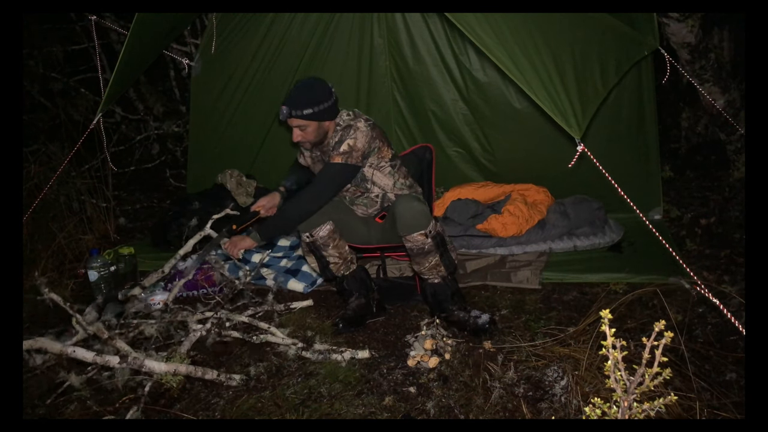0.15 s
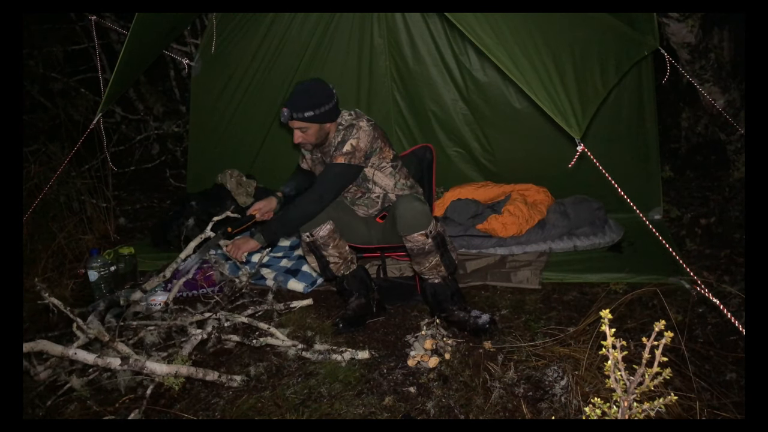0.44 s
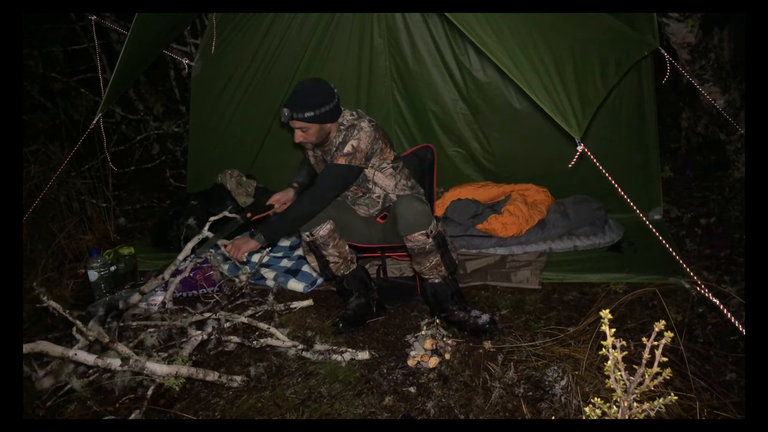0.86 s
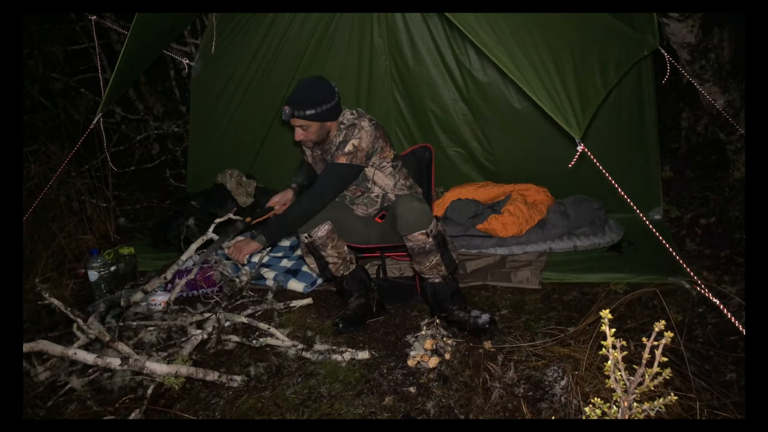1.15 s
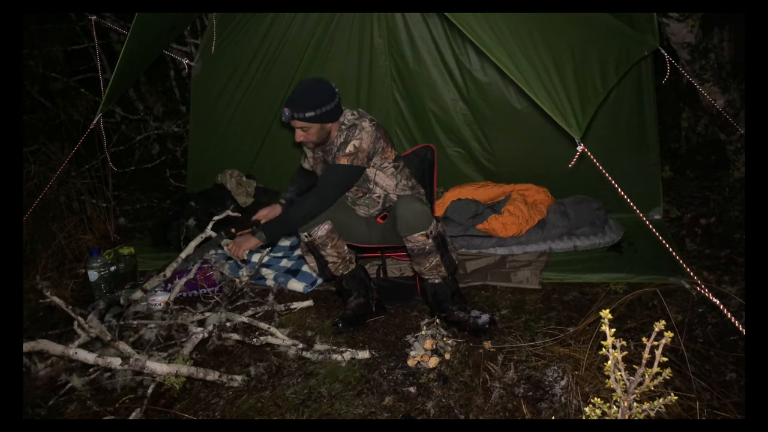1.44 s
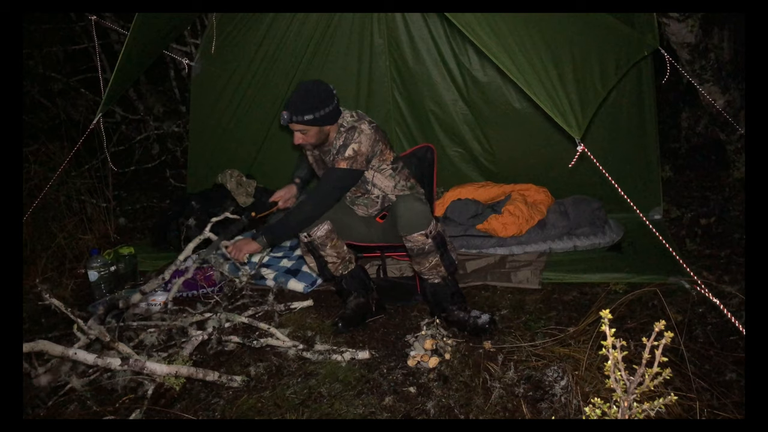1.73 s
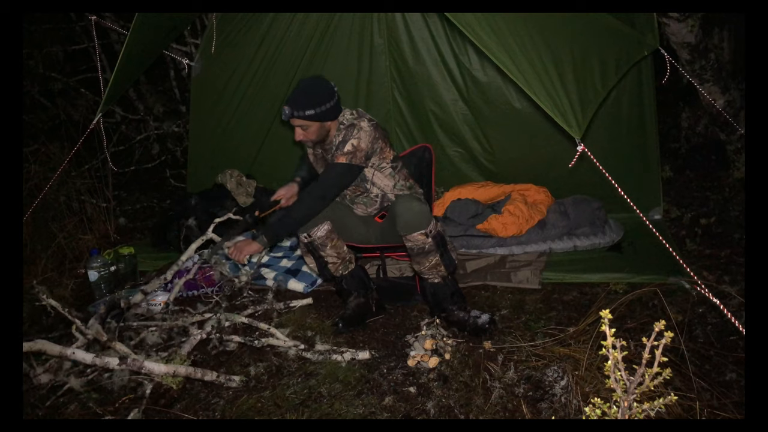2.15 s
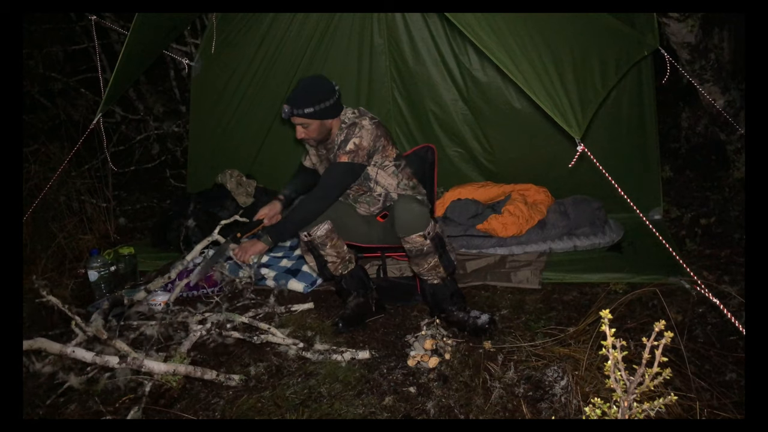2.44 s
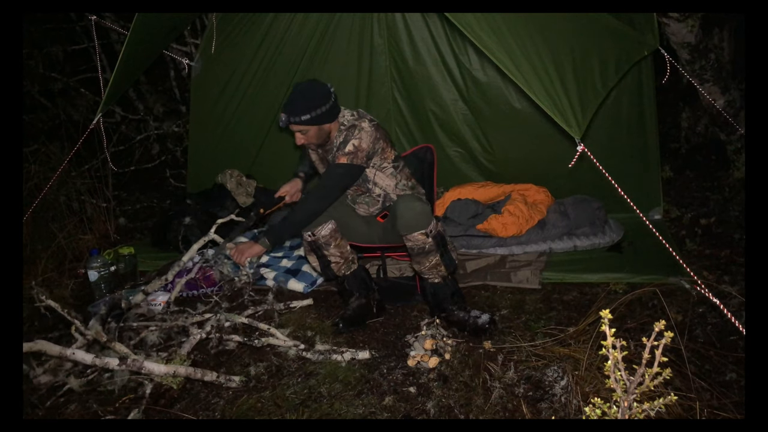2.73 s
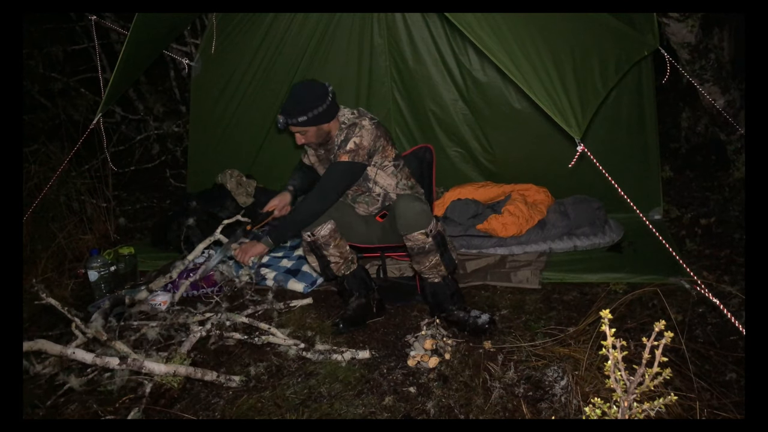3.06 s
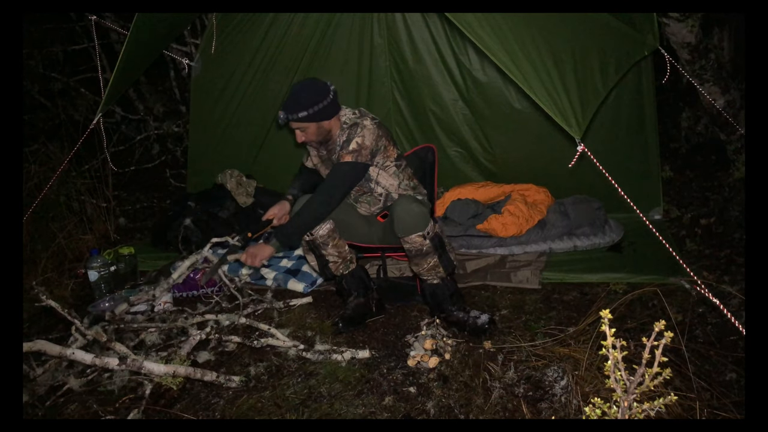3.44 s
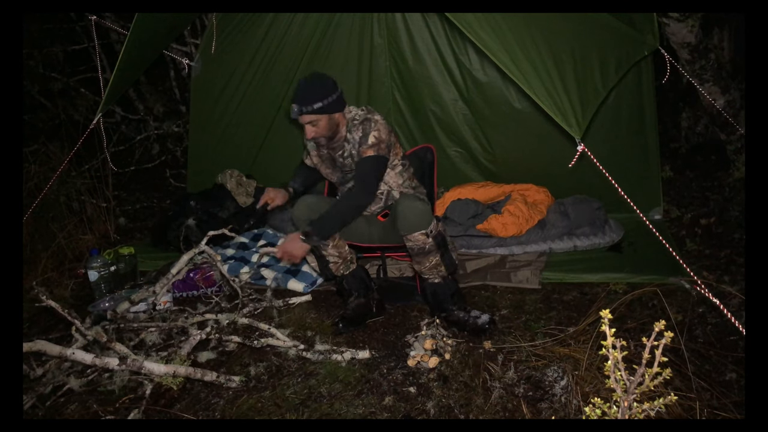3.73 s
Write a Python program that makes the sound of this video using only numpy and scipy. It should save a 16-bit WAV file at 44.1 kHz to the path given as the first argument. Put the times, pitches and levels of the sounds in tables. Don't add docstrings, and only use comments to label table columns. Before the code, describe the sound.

A small hand saw rasps back and forth through a dry branch until it snaps sharply

```python
import sys
import numpy as np
from scipy import signal
from scipy.fft import rfft, irfft
from scipy.io import wavfile
from scipy.ndimage import uniform_filter1d

SR = 44100
rng = np.random.default_rng(int(sys.argv[2]) if len(sys.argv) > 2 else 0)


def voltage_ratio(level):
    return 10 ** (np.asarray(level, float) / 20)


def bounce(signal):
    frames = np.transpose(np.atleast_2d(signal))
    limited = np.clip(frames, -1, 1)
    pcm = np.round(limited * 32767).astype(np.int16)
    wavfile.write(sys.argv[1], SR, pcm)


N = 171990

# centre in Hz, width in Hz, gain in dB.
WOOD_MODES = [(155, 220, -1.5), (227, 111, 4.5), (369, 103, -1), (668, 112, 2.5), (1135, 100, -0.5),
              (1467, 87, -2.5)]
BLOB_DB = 2.8


def level(x, db):
    return x * voltage_ratio(db) / np.sqrt(np.mean(x ** 2))


def colour(x, points):
    p, hz = np.array(points, float), np.fft.rfftfreq(len(x), 1 / SR)
    gain_db = np.interp(np.log(hz + 1), np.log(p[:, 0]), p[:, 1])
    return irfft(rfft(x) * voltage_ratio(gain_db), len(x))


def ring(x, hz, width):
    return signal.lfilter(*signal.iirpeak(hz, hz / width, SR), x)


def body(x, modes):
    return sum((-1) ** k * voltage_ratio(db) * ring(x, hz, width) for k, (hz, width, db) in enumerate(modes))


def filtered(x, order, hz, kind):
    return signal.sosfilt(signal.butter(order, hz, kind, fs=SR, output="sos"), x)


def walk(rate):
    hold = int(SR / rate)
    steps = np.repeat(rng.standard_normal(N // hold + 1), hold)
    return 1.272 * uniform_filter1d(uniform_filter1d(steps, hold), hold)[:N]


def grit(db, size=N):
    grain_db = db * np.minimum(rng.exponential(size=size), 4)
    return level(rng.standard_normal(size) * voltage_ratio(grain_db), 0)


def blobs(x, db, rate):
    hz = np.clip(np.fft.rfftfreq(N, 1 / SR), 500, 16000)
    place, spectrum = 4 * np.log2(hz / 500), rfft(x)
    out = np.zeros(N)
    for k in range(21):
        band = irfft(spectrum * np.clip(1 - np.abs(place - k), 0, 1), N)
        out += band * voltage_ratio(db * walk(rate))
    return out


def burst(t60, rise, size=8192):
    t = np.arange(size) / SR
    return (1 - np.exp(-t / rise)) * np.exp(-np.log(1000) * t / max(t60, 1e-3))


def add(out, start, x, db):
    i = int(start * SR)
    out[i:i + len(x)] += (x * voltage_ratio(db) / np.abs(x).max())[:N - i]


def night():
    # frequency in Hz, level in dB.
    air_curve = [(20, -46.5), (60, -2.5), (140, -7), (300, -11.5), (600, -12.5), (1200, -18), (5000, -23),
                 (16000, -28)]
    air = colour(rng.standard_normal(N), air_curve)
    return level(air * voltage_ratio(.8 * walk(21)), -73.5)


def brush():
    # time in seconds, level in dB.
    rustles = [
        [(0, -63), (.02, -76), (.05, -67), (.13, -69.5), (.2, -61.5), (.27, -67), (.32, -76), (.44, -75),
         (.5, -81)],
        [(1.77, -77), (1.81, -68), (1.87, -69)],
        [(2.28, -77), (2.32, -66.5), (2.37, -64)],
        [(3.0, -59.5), (3.05, -59.5), (3.09, -69), (3.11, -61.5), (3.28, -67), (3.33, -74)],
        [(3.37, -49), (3.42, -59), (3.45, -48.5), (3.488, -59.5), (3.517, -48), (3.545, -55.5), (3.565, -62),
         (3.6, -57.5), (3.64, -71)],
        [(3.64, -65.5), (3.69, -68.5), (3.715, -72), (3.733, -56.5), (3.752, -84), (3.795, -82), (3.82, -91)],
    ]
    # frequency in Hz, level in dB per Hz.
    brush_curve = [(60, -26.5), (150, -4), (450, -2.5), (900, -4), (2500, -5), (5000, -5.5), (9000, -6.5),
                   (16000, -16)]
    t, loud = np.arange(N) / SR, np.zeros(N)
    for rows in rustles:
        r = np.array(rows)
        loud += voltage_ratio(np.interp(t, r[:, 0], r[:, 1], -140, -140))
    scrape = level(colour(blobs(grit(2.8), BLOB_DB, 120), brush_curve), 0)
    scrape = scrape * loud * voltage_ratio(2 * walk(90))

    creak_start, creak_end = 0.94, 1.055
    u = np.clip((t - creak_start) / (creak_end - creak_start), 0, 1)
    pitch_hz = 1467 + 1216 * u
    creak = ring(rng.standard_normal(N), 150, 460) * np.sin(2 * np.pi * np.cumsum(pitch_hz) / SR)
    return scrape + level(creak, -63.5) * np.sin(np.pi * u)


def twigs():
    # start in seconds, peak in dB, centre in Hz, t60 in seconds.
    clicks = [(0.0668, -42.5, 9700, 0.008), (0.3864, -57, 5620, 0.008), (0.4294, -47.5, 6700, 0.018),
              (0.043, -59, 11000, 0.0092), (0.1430, -35.5, 9000, 0.017), (0.1700, -44, 6000, 0.008),
              (0.265, -54, 11000, 0.01), (0.3512, -43, 4400, 0.0088), (0.4025, -60, 8000, 0.008),
              (0.5425, -47, 5050, 0.01), (0.5553, -39, 7950, 0.0091), (0.6010, -37.5, 7670, 0.0074),
              (0.668, -41, 8000, 0.008), (0.9044, -53, 8800, 0.013), (0.9275, -36.5, 9400, 0.02),
              (0.9362, -26, 8100, 0.014), (0.9499, -24, 6100, 0.0091), (1.1488, -38.5, 7800, 0.01),
              (1.138, -52, 4480, 0.022), (1.1748, -35, 8300, 0.004), (1.365, -53, 7140, 0.012),
              (1.3876, -37.5, 8750, 0.01), (1.4225, -42, 7250, 0.01), (1.5143, -42, 3300, 0.044),
              (1.5617, -43.5, 6670, 0.018), (1.5722, -47, 4000, 0.01), (1.59, -36, 4790, 0.01),
              (1.8637, -37.5, 4340, 0.03), (1.9024, -25, 6760, 0.016), (1.9112, -26, 5900, 0.005),
              (2.105, -39.5, 12200, 0.01), (2.116, -40.5, 3190, 0.01), (2.329, -49.5, 6780, 0.009),
              (2.371, -38.5, 5700, 0.036), (2.523, -45, 8650, 0.01), (2.5325, -44, 6510, 0.01),
              (2.5714, -31, 7290, 0.0098), (2.5837, -33.5, 3730, 0.01), (2.609, -30.5, 5740, 0.01),
              (2.856, -51.5, 3298, 0.015), (2.8785, -49, 5590, 0.01), (2.8882, -40, 5654, 0.01),
              (3.109, -48, 3610, 0.015), (3.6646, -50, 4987, 0.01), (3.691, -49.5, 4000, 0.01),
              (3.7475, -48, 8900, 0.01), (3.794, -57.5, 9000, 0.012), (3.802, -58.5, 9730, 0.01),
              (3.857, -65, 4020, 0.01)]
    # start in seconds,
    # peak in dB, centre in Hz, t60 in seconds.
    scuffs = [(0.0975, -32.5, 3180, 0.018), (0.1035, -38, 7900, 0.009), (0.2339, -44, 4500, 0.015),
              (0.3485, -46.5, 4520, 0.035), (0.521, -56.5, 2940, 0.084), (1.4813, -38, 7830, 0.025),
              (1.489, -41.5, 8500, 0.0092), (1.798, -51, 3500, 0.044), (1.804, -52.5, 9600, 0.026),
              (1.9135, -34, 7000, 0.014), (2.047, -45, 2100, 0.02), (2.3112, -57, 3190, 0.05),
              (3.341, -46, 7000, 0.022), (3.3665, -25.5, 9000, 0.023), (3.3705, -36, 4500, 0.02),
              (3.4428, -33, 7500, 0.017), (3.4485, -36, 2940, 0.022), (3.4925, -43, 2920, 0.023)]
    # start in seconds, peak in dB, centre in Hz, t60 in seconds.
    woody_taps = [(0.0177, -53.5, 2800, 0.023), (0.0413, -65, 2590, 0.014), (0.1324, -46, 2750, 0.02),
                  (0.1427, -39.5, 2300, 0.013), (0.1695, -41, 1280, 0.016), (0.2085, -49.5, 2050, 0.02),
                  (0.2882, -57, 2380, 0.014), (1.03, -50, 2290, 0.03), (1.75, -57.5, 2180, 0.03)]
    # start in seconds, peak in dB, t60 in seconds.
    dull_knocks = [(0.101, -56, 0.11), (0.143, -49.5, 0.076), (0.169, -49, 0.027), (0.233, -50, 0.025),
                   (0.349, -55, 0.039), (0.99, -52, 0.042), (1.489, -51, 0.047), (1.993, -45, 0.1),
                   (2.495, -50, 0.07), (3.448, -56, 0.032), (3.499, -57, 0.14), (3.602, -64, 0.042)]
    out = np.zeros(N)
    kinds = ((clicks, .0002, 4.5, 9.5), (scuffs, .002, 4.5, 0), (woody_taps, .0006, -5, 0))
    for rows, rise, wide_db, spike_db in kinds:
        for start, db, hz, t60 in rows:
            spike = voltage_ratio(spike_db) * burst(0.0023, rise)
            tail = voltage_ratio(-15) * burst(t60 * 5, 0.0016)
            x = rng.standard_normal(8192) * (burst(t60, rise) + spike + tail)
            wide = filtered(x, 2, [hz * 0.54, 14000], "band")
            add(out, start, level(ring(x, hz, hz * 0.23), 0) + level(wide, wide_db), db)
    for start, db, t60 in dull_knocks:
        knock = body(rng.standard_normal(8192) * burst(t60, 0.00069), WOOD_MODES)
        add(out, start, filtered(knock, 2, 1000, "low"), db)
    return out


def saw():
    # start in seconds, length in seconds, level in dB, place of the peak 0-1, wood body in dB.
    strokes = [(0.525, .25, -52.5, .5, 4.5), (0.911, 0.19, -56, 0.25, 2.5), (1.131, .19, -49, 0.48, 2.5),
               (1.367, 0.16, -52, 0.49, 3.5), (1.516, .04, -72, 0.43, 13), (1.553, .195, -48, 0.45, 3.5),
               (1.854, 0.21, -49.5, 0.38, 4), (2.03, 0.075, -58, 0.47, 8), (2.089, 0.22, -48, .35, 3),
               (2.354, 0.18, -49.5, 0.46, 1), (2.514, 0.34, -52, 0.39, 3.5), (2.86, 0.17, -51, 0.5, 2.5),
               (3.101, 0.19, -52, 0.36, 0)]
    # frequency in Hz, level in dB per Hz.
    hiss_curve = [(500, -37), (900, -18.5), (1900, -12), (2700, -7), (5000, -5.5), (6400, -6), (8500, -6),
                  (16000, -12)]
    # centre in Hz, width in Hz, gain in dB.
    blade_modes = [(2750, 250, -4), (3730, 220, -2), (4400, 200, -2), (4850, 250, 0), (5600, 250, -2),
                   (7290, 250, -3), (8800, 200, -3), (9700, 250, -2)]
    fullness, fade = 0.9, 1.54
    patchy_db = 1.4
    t, speed, loud, wood = np.arange(N) / SR, np.zeros(N), np.zeros(N), np.zeros(N)
    for start, length, db, peak, wood_db in strokes:
        bend = np.log(.5) / np.log(np.clip(peak, .05, .95))
        u = np.clip((t - start) / length, 0, 1) ** bend
        v = np.abs(np.sin(np.pi * u))
        speed = np.maximum(speed, v)
        loud = loud + voltage_ratio(db) * v ** np.where(u < .5, fullness, fade) * (u < 1)
        wood += voltage_ratio(db + wood_db) * v ** fullness * (u < 1)

    tooth_hz = 264 * (.35 + .65 * speed) * (1 + 0.1213 * walk(90))
    turns = np.cumsum(tooth_hz) / SR
    size = voltage_ratio(1 * rng.standard_normal(3000))[turns.astype(int)]
    bite = level(1 + 0.097 * (size * (1 - np.cos(2 * np.pi * turns)) - 1), 0)

    tear = loud * bite * grit(3)
    hiss = colour(blobs(tear, BLOB_DB, 130), hiss_curve) * voltage_ratio(patchy_db * walk(39.83))
    low = ring(hiss, 3400, 6400)
    high = (hiss - low) * speed ** 0.4
    hiss = low * voltage_ratio(patchy_db * walk(55)) + high * voltage_ratio(patchy_db * walk(91))
    blade = sum(voltage_ratio(db + 4 * walk(8.13)) * ring(tear, hz, width) for hz, width, db in blade_modes)

    shake = level(body(rng.standard_normal(N) * wood * bite, WOOD_MODES), 0)
    tone = level(wood * size * np.sin(2 * np.pi * turns) * voltage_ratio(4 * walk(25)), 0)
    bright = level(level(hiss, 0) + level(blade, -11.5), 0)
    woody = voltage_ratio(-12) * (shake + voltage_ratio(-6.5) * tone)
    return np.sqrt(np.mean(loud ** 2)) * (bright + woody)


def snaps():
    # start in seconds, peak in dB, crack t60 in seconds, splinter tail in dB, brightness in dB.
    breaks = [
        (3.3322, -27, .022, -32, 5),
        (3.3590, -9.5, .008, -36, 0),
        (3.3596, -14, .012, -50, -2),
        (3.3614, -18, .024, -50, 0),
        (3.4325, -22, .002, -32, 6),
        (3.4339, -13, .001, -40, 10),
    ]
    # centre in Hz, width in Hz, gain in dB.
    low_modes = [(1010, 330, -7.5), (1360, 370, -6), (2585, 230, 1), (3010, 200, 1), (3620, 390, -6.5),
                 (4610, 460, -1.5), (5550, 350, -3.5), (6340, 350, -4.5)]
    # centre in Hz, width in Hz, gain in dB.
    high_modes = [(7750, 500, -4.5), (8500, 680, -1.5), (9870, 340, -3.5), (12500, 400, -6),
                  (13900, 730, -9)]
    out = np.zeros(N)
    for start, db, t60, tail_db, bright_db in breaks:
        x = voltage_ratio(-19) * rng.standard_normal(8192) * burst(t60, 0.0003)
        x[2] += 1
        splinters = voltage_ratio(tail_db) * grit(4, size=8192) * burst(.11, .002)
        x = x + splinters * voltage_ratio(3.2 * walk(480)[:8192])
        low = voltage_ratio(-bright_db) * body(x, low_modes[:2]) + body(x, low_modes[2:])
        middle = voltage_ratio(-17) * ring(x, 3900, 4000)
        high = body(x, high_modes) + voltage_ratio(-10.5) * ring(x, 12000, 8300)
        add(out, start, low + middle + voltage_ratio(bright_db - 6) * high, db)
    return filtered(out, 2, 350, "high")


def scene():
    return np.tile(night() + brush() + twigs() + saw() + snaps(), (2, 1))


def low_pass(x):
    return signal.sosfilt(signal.butter(12, 16830, fs=SR, output="sos"), x)


def record(dry):
    dry = filtered(dry, 2, 55, "high")
    dry = signal.sosfilt(signal.cheby1(16, .5, 15950, fs=SR, output="sos"), dry)
    return low_pass(dry)


dry = scene()
out = record(dry)
bounce(out)
```